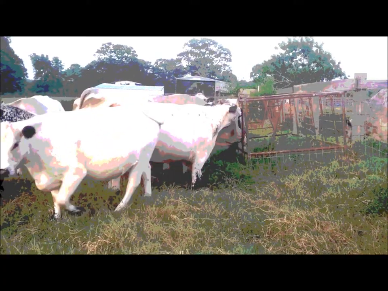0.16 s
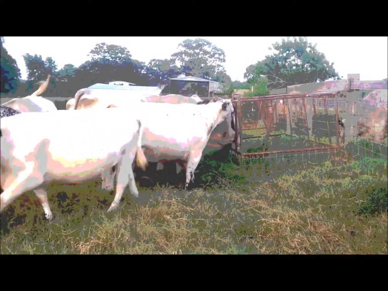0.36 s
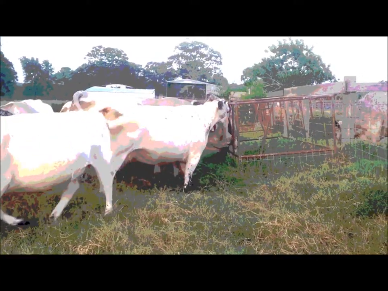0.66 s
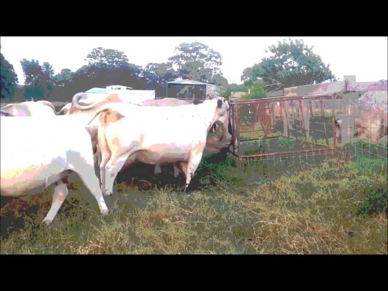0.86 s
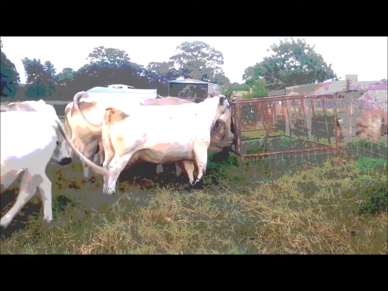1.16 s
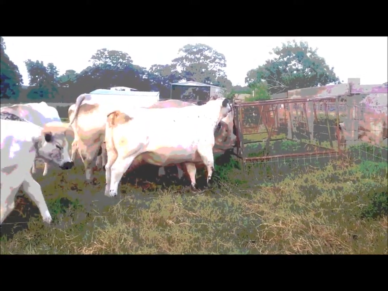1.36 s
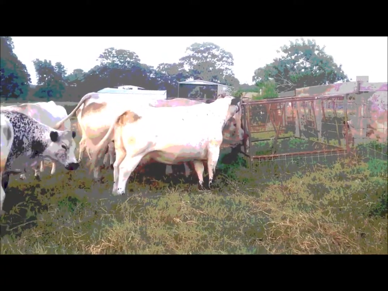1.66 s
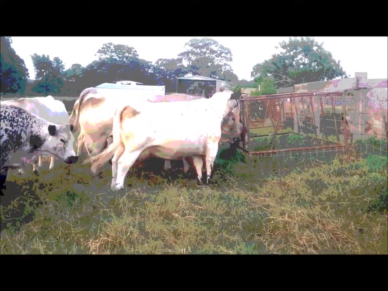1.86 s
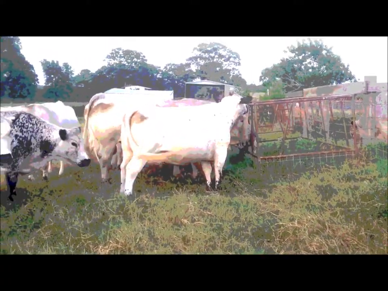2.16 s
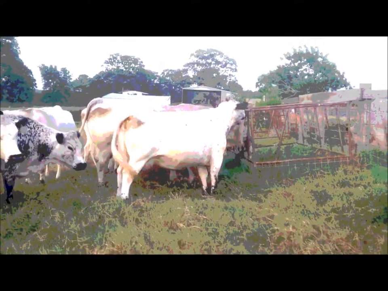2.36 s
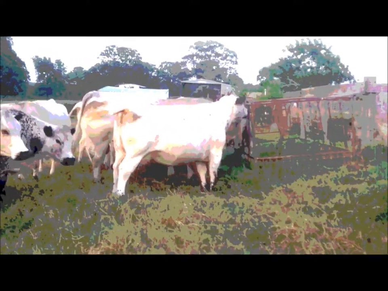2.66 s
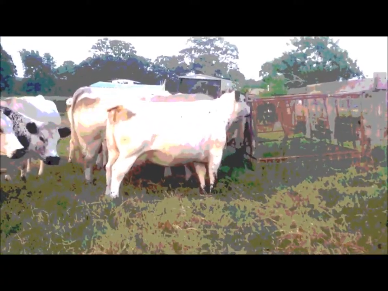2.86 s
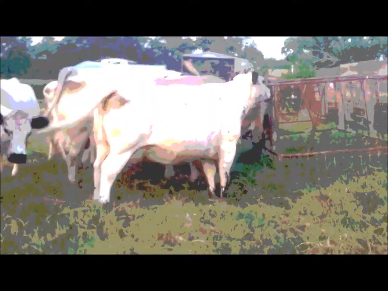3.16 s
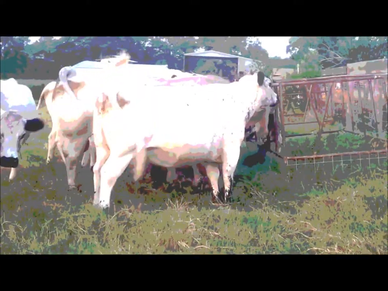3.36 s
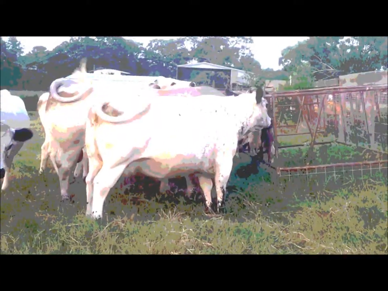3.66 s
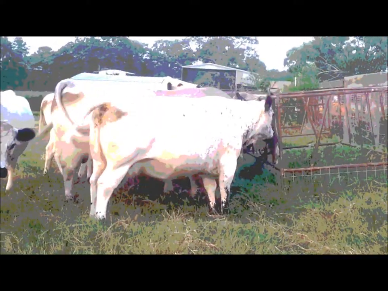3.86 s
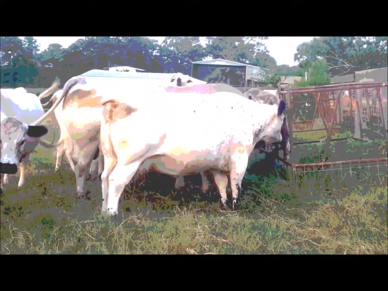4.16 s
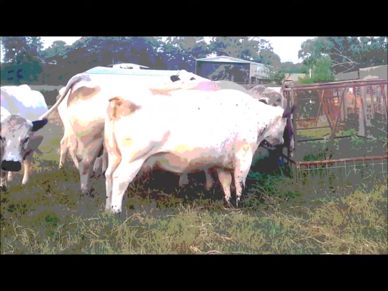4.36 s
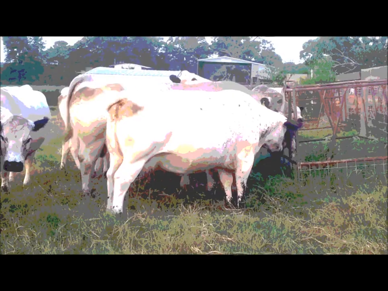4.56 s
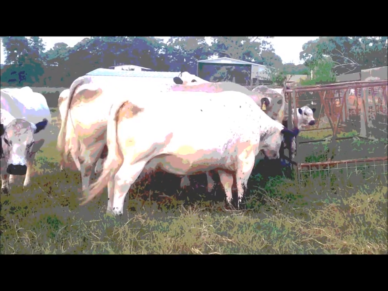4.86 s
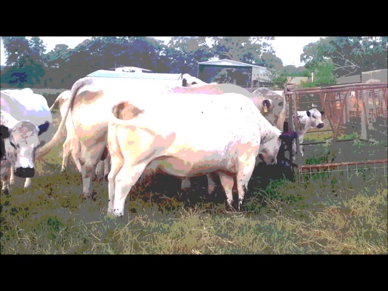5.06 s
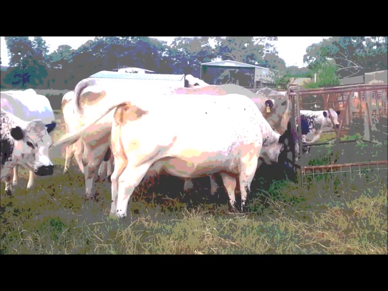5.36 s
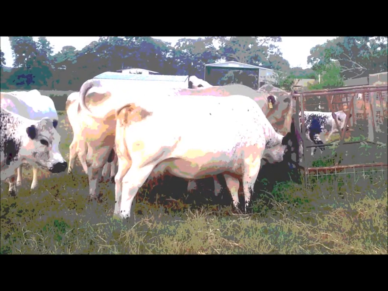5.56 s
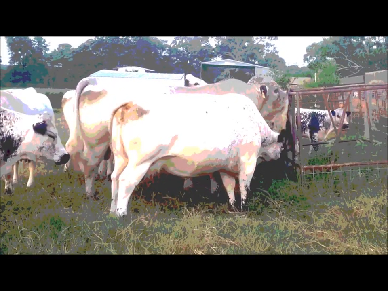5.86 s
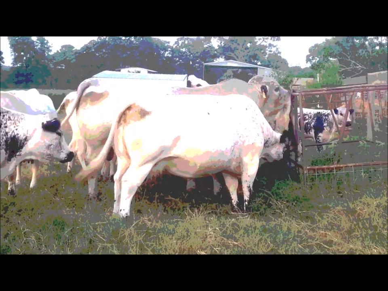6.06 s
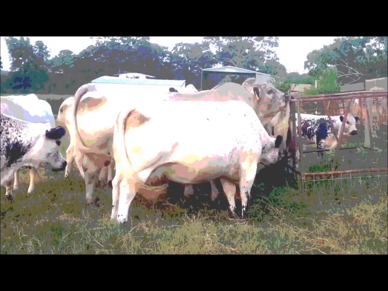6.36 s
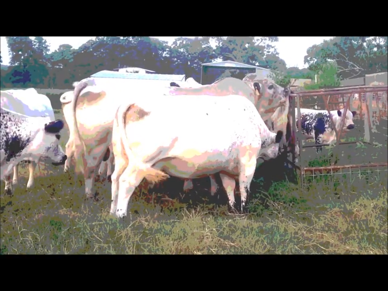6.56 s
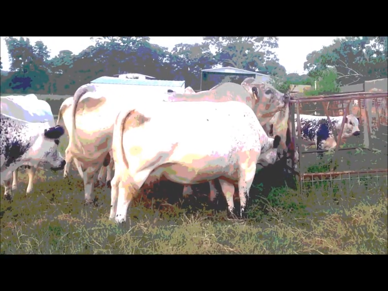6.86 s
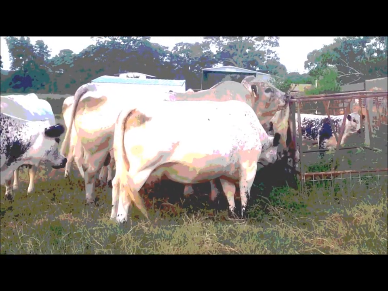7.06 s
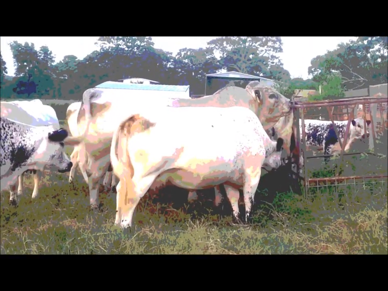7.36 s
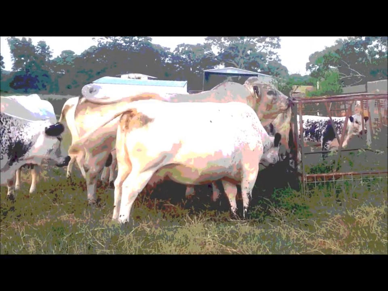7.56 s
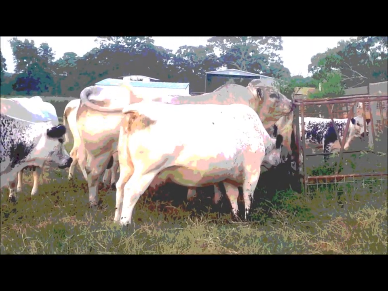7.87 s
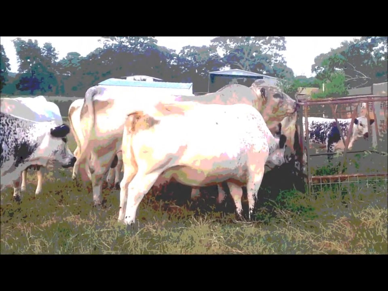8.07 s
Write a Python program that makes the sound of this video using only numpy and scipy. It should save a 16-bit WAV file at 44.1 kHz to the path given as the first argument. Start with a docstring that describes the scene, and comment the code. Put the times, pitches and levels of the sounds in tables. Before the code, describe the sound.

A nearby cow hums a long low closed-mouth moo, then two others bawl over each other, followed by a growl, snorts and hoof thuds.

```python
"""A near cow hums a long closed-mouth moo and grunts, as cattle crowd at a gate in a summer paddock.
Two others bawl open-mouthed over each other and one growls: vocal-fold harmonics pass through throat resonances.
Snorts are fluttering turbulence, whistles are narrow-band resonances, and hooves thud as damped pushes on turf.
The gate clicks in decaying modes, shaped noise makes rustling grass and a light breeze,
and two bush crickets buzz high as frequency-swept tones."""
import sys
import numpy as np
from scipy import signal
from scipy.fft import rfft, irfft, next_fast_len
from scipy.io import wavfile
from scipy.ndimage import uniform_filter1d, map_coordinates

SR = 44100
rng = np.random.default_rng(int(sys.argv[2]) if len(sys.argv) > 2 else 0)


def persist_wave(psi):
    """Save psi, clipped to +-1, as 16-bit WAV."""
    counts = np.round(np.clip(psi, -1, 1) * 32767).astype(np.int16)
    wavfile.write(sys.argv[1], SR, np.atleast_2d(counts).T)


N = 362047
T = np.arange(N) / SR

# low-frequency noise spectrum of breeze and hoof scuffs: f/Hz, relative level/dB
RUMBLE = [(20, -28), (40, -2), (58, 1.5), (90, 1.5), (150, -9), (250, -20), (500, -47.5)]


def undb(db):
    """Amplitude ratio: 20 dB are a factor of ten."""
    return 10 ** (np.asarray(db) / 20)


def unit(x):
    """Normalisation by effective value: scale to rms 1."""
    return x / np.sqrt(np.mean(x ** 2) + 1e-20)


def curves(table, t):
    """Linear interpolation: the columns of a table at times t."""
    s, *columns = np.transpose(table)
    return [np.interp(t, s, c) for c in columns]


def response(shape, hz):
    """Transfer function: the gain of a (f/Hz, level/dB) shape, interpolated over log frequency."""
    f, db = np.transpose(shape)
    return undb(np.interp(np.log(hz + 1), np.log(f), db))


def colour(x, shape):
    """Spectral filtering: weight each frequency by a shape that falls away beyond its ends; rms 1."""
    size = next_fast_len(len(x))
    hz = np.arange(size // 2 + 1) * SR / size + 0.00092  # the offset avoids division by zero
    top = 1 / (1 + (hz / shape[-1][0]) ** 12)
    bottom = 1 / (1 + (.5 * shape[0][0] / hz) ** 4)
    spectrum = rfft(x, size) * response(shape, hz) * top * bottom
    return unit(irfft(spectrum, size)[:len(x)])


def walk(t, rate):
    """Band-limited chance: a smooth curve through `rate` random values a second, spread about 1."""
    steps = (t - t[0]) * rate
    grid = np.arange(0, steps[-1] + 1, 1 / 10)
    values = rng.standard_normal(int(steps[-1]) + 2)
    smooth = map_coordinates(values, [grid], order=2, mode="nearest")
    return np.interp(steps, grid, smooth)


def span(start, end):
    """Uniform sampling: the sample times from start to end."""
    return np.arange(int(start * SR), int(end * SR)) / SR


def swell(t, edge, release=None):
    """Sine-squared envelope: opens over `edge` seconds, closes over `release` (the same unless given)."""
    opening = np.minimum((t - t[0]) / edge, (t[-1] - t) / (release or edge))
    return np.sin(np.pi / 2 * np.clip(opening, 0, 1)) ** 2


def add(out, t, x):
    """Superposition: mix x into out at its own times."""
    index = int(round(t[0] * SR)) + np.arange(len(x))
    inside = (index >= 0) & (index < N)
    out[index[inside]] += x[inside]


def yard(x, t60_s=0.3, wet_db=-17):
    """Diffuse reverberation: sheds and trees return faint scattered echoes that decay exponentially."""
    t = span(0, .6)
    tail = rng.standard_normal(len(t)) * np.exp(-np.log(1000) * t / t60_s) * (t > .012)
    tail = colour(tail, [(150, -5.0), (500, -12), (2000, -8.5), (7000, -5.5)]) / np.sqrt(len(t))
    return x + undb(wet_db) * signal.fftconvolve(x, tail)[:N]


def countryside():
    """Broadband ambience: distant sound is noise weighted towards the bass, with a drifting level."""
    # spectrum of the far countryside: f/Hz, relative level/dB
    far_shape = [(24, -24), (40, -10), (81, 2.5), (252, -11), (448, -12.5), (668, -10.5), (974, -11.5),
                 (2160, -25.5), (3760, -26.5), (6410, -31), (8000, -33.5), (10400, -66.5), (17600, -120)]
    return colour(rng.standard_normal(N), far_shape) * undb(-58.5 + 2.3 * walk(T, 6))


def breeze():
    """Wind noise: turbulence at the microphone gives a gusting low-frequency rumble."""
    # gusts of the breeze: t/s, level/dB
    gusts = [(0, -55), (.6, -62), (2.1, -62), (2.55, -56.5), (2.8, -50.5), (3.2, -58), (3.8, -56.5),
             (4.1, -55), (5.2, -55), (5.4, -43.5), (5.55, -60.5), (6.3, -64), (7.5, -54.5), (8.2, -69)]
    [wind_db] = curves(gusts, T)
    return colour(rng.standard_normal(N), RUMBLE) * undb(wind_db + 2.0 * walk(T, 13))


def grass():
    """Incoherent summation: crackling of dry blades and swishes add as powers, shaping impulsive noise."""
    # legs and tails swishing through dry grass: middle t/s, length/s, level/dB
    swishes = [(0.02, 0.17, -57), (0.634, 0.34, -58.5), (1.1, 0.16, -56), (1.65, 0.69, -62),
               (2.128, 0.32, -61), (2.724, 0.6, -62.5), (3.313, 0.26, -56), (4.017, 0.38, -57),
               (4.849, 0.19, -58.5), (5.39, 0.37, -56), (6.398, 0.31, -58.5), (6.87, 0.31, -60),
               (7.412, 0.44, -59), (7.815, 0.11, -57), (8.175, 0.12, -58)]
    # spectrum of dry blades: f/Hz, relative level/dB
    rustle = [(1500, -6.5), (2500, -1), (3700, 3.5), (5000, -5), (6500, -7.5), (9000, 2.5), (11500, 1.5),
              (13500, -4.5), (16000, -4.5)]
    # the rustle between swishes dies down as the herd settles
    grass_db, fade_db_per_s = -61, 0.5
    drift_db = .8 * walk(T, 5)
    power = undb(grass_db - fade_db_per_s * T + drift_db) ** 2
    for middle, length, db in swishes:
        t = span(middle - length / 2, middle + length / 2)
        add(power, t, undb(db) ** 2 * swell(t, length / 2))
    # exponential chance in decibels makes a few samples stand out as crackles
    crackle_db = np.minimum(2.4 * rng.exponential(size=N), 19)
    blades = rng.standard_normal(N) * undb(crackle_db)
    flicker_db = 1.2 * walk(T, 35)
    return colour(blades, rustle) * np.sqrt(power) * undb(flicker_db)


def cricket(stroke_hz, base_hz, arch_hz, scatter_hz):
    """Stridulation: each wing stroke speeds up and slows down, so the tooth rate draws an arch."""
    stroke = np.cumsum(stroke_hz * (1 + 0.0091 * walk(T, 20))) / SR % 1
    arch = np.sin(np.pi * np.minimum(stroke / 0.74, 1))  # silent for the rest of the stroke
    hz = base_hz + arch_hz * arch + scatter_hz * walk(T, 1500)
    tone = np.sqrt(abs(arch)) * np.sin(2 * np.pi * np.cumsum(hz) / SR)
    return unit(tone) * undb(1.1 * walk(T, 30))


def crickets():
    """Two independent stridulators: a near one sings in bouts; a farther, lower one never stops."""
    # near cricket's bouts of song: start t/s, end t/s, level/dB
    bouts = [(-.1, 6.3, -63), (6.44, 6.85, -65.5)]
    gate = np.zeros(N)
    for start, end, db in bouts:
        t = span(start, end)
        add(gate, t, undb(db) * swell(t, 0.03))
    near = gate * cricket(stroke_hz=67.7, base_hz=9123, arch_hz=890, scatter_hz=89.7)
    return near + undb(-68) * cricket(stroke_hz=70, base_hz=8750, arch_hz=400, scatter_hz=220)


def clicks(crack=0.47, crack_s=0.0012):
    """Impact excitation: a short noisy crack with a ring of exponentially damped modes."""
    # gate latch and dry stalks: t/s, peak level/dB
    strikes = [(2.088, -41.5), (2.345, -45), (2.351, -29.5), (2.356, -35), (7.621, -48), (7.68, -45.5)]
    # modes of the ring: f/Hz, relative level/dB, t60/s
    modes = [(2330, -1, 0.026), (2850, 3, 0.01), (3750, 8, 0.0074), (5300, 4, 0.0068), (5940, -5, 0.02),
             (6620, 3, 0.0088)]
    out, t = np.zeros(N), span(0, .05)
    for start, db in strikes:
        ring = 0
        for hz, mode_db, t60 in modes:
            mode = np.sin(2 * np.pi * (hz * t + rng.random()))
            ring = ring + undb(mode_db) * mode * np.exp(-np.log(1000) * t / t60)
        click = ring + crack * rng.standard_normal(len(t)) * np.exp(-t / crack_s)
        add(out, t + start, click / abs(click).max() * undb(db))
    return out


def hooves(decay_s=0.018, push_s=0.0036, scuff=0.65, gain_db=-3):
    """Heavily damped oscillation: each hoof gives the turf a soft push that soon dies out."""
    # heavy hoof falls: t/s, level/dB before gain_db, f/Hz
    falls = [(2.779, -40, 104), (3.071, -42, 142), (3.56, -37, 188), (4.06, -43, 90), (4.274, -42, 82),
             (4.739, -40, 57), (5.07, -44, 72.7), (5.379, -48, 75.4), (5.709, -38, 174), (5.988, -44, 120),
             (6.359, -43, 149), (6.537, -45, 184), (7.107, -45, 105), (7.349, -34, 63), (7.494, -39.5, 56),
             (7.542, -36, 73.6), (7.713, -36.5, 89), (7.756, -36, 62.6)]
    out, t = np.zeros(N), span(0, 0.12)
    for start, db, hz in falls:
        thud = np.sin(2 * np.pi * hz * t) + scuff * colour(rng.standard_normal(len(t)), RUMBLE)
        shape = (1 - np.exp(-t / push_s)) * np.exp(-t / decay_s)
        add(out, t + start, -thud * shape / shape.max() * undb(db + gain_db))
    return out


def snorts(attack_share=0.34, release_share=0.41):
    """Modulated turbulence: air blasts flapping nostrils; wet snorts burst open, dry hissing ones swell."""
    # blasts: t/s, length/s, flutter level/dB, hiss level/dB relative to the flutter
    blasts = [(1.799, 0.048, -50.5, -12), (2.476, 0.043, -52.5, -7), (2.734, .1, -48.5, -14),
              (3.02, 0.12, -45.5, -12), (4.064, 0.06, -52.5, -7), (4.575, 0.087, -56, -7),
              (4.784, 0.1, -44, -8.5), (4.999, .13, -43.5, -8), (5.254, .26, -44, -9.5),
              (5.628, 0.036, -45.5, -16.5), (5.657, 0.12, -50.5, -17), (5.901, 0.049, -46.5, -16),
              (6.327, 0.072, -51.5, -4.5), (6.53, .1, -56.5, 1.5), (6.737, 0.084, -56, -3),
              (7.093, 0.073, -54, -4), (7.305, .08, -51.5, -5.5), (7.518, 0.073, -54, -5.5),
              (7.928, .1, -53, -4), (8.153, 0.13, -54, -0.5)]
    # nostril flutter shaped by the long nasal passages: f/Hz before the flare, relative level/dB
    flutter_shape = [(110, 1.5), (180, 4.5), (300, -21), (560, -12), (680, 2), (780, -1), (890, -19.5),
                     (980, -5), (1280, -19.5), (1520, -14), (2000, -14), (3000, -47)]
    # hiss from the same passages: f/Hz before the flare, relative level/dB
    hiss_shape = [(900, 3.5), (1400, -2.5), (1770, 2.5), (1980, -30), (2230, 12.5), (2450, 3), (2760, 7),
                  (3080, 1.5), (3250, 6.5), (3500, 3.5), (3750, 1.5), (4000, 2.5), (4600, -3.5),
                  (7000, -21)]
    out = np.zeros(N)
    for start, length, db, hiss_db in blasts:
        t = span(start, start + length)
        flap = undb(2.8 * walk(t, 220))
        # the nostrils flare differently each time, which shifts their resonances but not the levels
        flare = np.array([1 + .045 * rng.standard_normal(), 1])
        flutter = colour(rng.standard_normal(len(t)) * flap, flare * flutter_shape)
        hiss = colour(rng.standard_normal(len(t)) * flap, flare * hiss_shape)
        dryness = np.clip((hiss_db + 16) / 8, .12, 1)
        envelope = swell(t, length * attack_share * dryness, release_share * length)
        add(out, t, (flutter + undb(hiss_db) * hiss) * undb(db) * envelope)
    return out


def whistles():
    """Narrow-band noise: air in a narrow passage rings one gliding resonance, half tone and half hiss."""
    # wheezes in nose and throat: t/s, length/s, first f/Hz, last f/Hz, random changes/Hz, level/dB
    wheezes = [(-.04, 0.157, 1520, 1464, 75.6, -58.5), (.08, .5, 1780, 1850, 270, -64.5),
               (.72, 0.14, 1200, 1250, 70, -65.5), (0.92, 0.23, 1620, 1600, 130, -69),
               (.85, 1, 2520, 2950, 350, -66.5), (2.826, .2, 3240, 3100, 241, -60)]
    out = np.zeros(N)
    for start, length, first_hz, last_hz, change_hz, db in wheezes:
        t = span(start, start + length)
        angle = 2 * np.pi * np.cumsum(np.linspace(first_hz, last_hz, len(t))) / SR
        ring = walk(t, change_hz) * np.sin(angle) + walk(t, change_hz) * np.cos(angle)
        add(out, t, unit(ring) * undb(db) * swell(t, 0.14 * length))
    return out


def folds(t, hz, jitter):
    """Quasi-periodic oscillation: phase of the vocal folds in cycles, with random frequency jitter."""
    return np.cumsum(hz * (1 + jitter * walk(t, 90))) / SR


def voiced(phase, hz, throat, split_hz, spread, waver_db):
    """Source-filter theory: fold harmonics through the throat, split into (chest part, mouth part)."""
    t = np.arange(len(hz)) / SR
    slow_t, slow_hz = t[::32], hz[::32]  # gains change slowly, so a coarse time grid serves
    chest, mouth = 0, 0
    for k in range(1, int(throat[-1][0] / np.mean(hz)) + 1):
        low = 1 / (1 + (k * slow_hz / split_hz) ** 8)
        # the soft tongue and palate quiver, so each upper harmonic wavers by itself
        waver = undb(waver_db * (1 - low) * walk(slow_t, 45.1))
        gain = response(throat, k * slow_hz) * waver
        # the throat delays each harmonic differently, which spreads the pulse
        wave = np.cos(2 * np.pi * k * phase + spread * rng.standard_normal())
        chest = chest + wave * np.interp(t, slow_t, gain * low)
        mouth = mouth + wave * np.interp(t, slow_t, gain * (1 - low))
    return chest, mouth


def puffs(phase, throat, open_share):
    """Pulsed turbulence: airflow noise bursts once a fold cycle and decays within it."""
    return colour(rng.standard_normal(len(phase)) * np.exp(-(phase % 1) / open_share), throat)


def open_moo(t, hz, chest_db, mouth_db, hoarse, throat, jitter, waver_db, air_db, spread, shimmer=0.089):
    """Open-tract resonance: chest tone plus bright mouth; hoarseness shakes the folds and leaks air."""
    out = np.zeros(N)
    phase = folds(t, hz, jitter * hoarse)
    chest, mouth = voiced(phase, hz, throat, split_hz=470, spread=spread, waver_db=waver_db)
    air = hoarse * undb(air_db) * puffs(phase, throat, open_share=1.0)
    mouth = unit(mouth) * (1 + shimmer * walk(t, 118.7)) + air
    call = unit(chest) * undb(chest_db) + mouth * undb(mouth_db)
    add(out, t, call * swell(t, 0.02))
    return out


def growl():
    """Low-rate pulsation: slow, crisp fold pulses grow brighter over a steady chest tone."""
    # throat response: f/Hz, relative level/dB
    throat = [(65, -1), (140, -5.5), (210, -5.5), (300, -15), (500, -46), (800, -9), (1200, -30),
              (1900, -26), (2230, -3.5), (2500, -31), (2760, -1.5), (2950, -21), (3230, -7.5), (3700, -31)]
    start_hz, sag_hz_per_s = 71.5, 3.7
    drop_hz, drop_s = 4.5, 0.0388  # the pitch falls away at the very end
    t = span(4.03, 5.11)
    age = t - t[0]
    hz = start_hz - sag_hz_per_s * age - drop_hz * np.exp((t - t[-1]) / drop_s)
    mouth_db = -64.5 + 7 * age
    return open_moo(t, hz, -53.5, mouth_db, 0.13, throat, jitter=.016, waver_db=1.5, air_db=2, spread=.25)


def bawl(table, throat, chest_db, boom_db, chest_attack_s, chest_release_s, hoarse, end_hoarse, air_db,
         waver_db, closing_s):
    """Resonant coupling: the chest tone builds, then booms near resonance; the end is hoarse and dull."""
    # the chest booms whenever the second harmonic glides through the throat's lowest resonance
    boom_hz, boom_width_hz = 368, 59
    t = span(table[0][0], table[-1][0])
    hz, db = curves(table, t)
    boom = 1 / (1 + (2 * (2 * hz - boom_hz) / boom_width_hz) ** 2)
    build_db = 20 * np.log10(swell(t, chest_attack_s, chest_release_s) + 1e-6)
    # the voice turns hoarse as its breath runs out
    breathless = np.exp(-((t - t[-1]) / .17) ** 2)
    hoarseness = hoarse + (end_hoarse - hoarse) * breathless
    call = open_moo(t, hz, db + chest_db + boom_db * boom + build_db, db, hoarseness, throat,
                    jitter=0.0181, waver_db=waver_db, air_db=air_db, spread=1.12)
    # the closing mouth muffles the call
    muffled = signal.sosfiltfilt(signal.butter(2, 1900, fs=SR, output="sos"), call)
    closing = np.clip(1 + (T - t[-1]) / closing_s, 0, 1)
    return call + closing * (muffled - call)


def first_bawl():
    """Formant filtering: an arched call whose chest tone enters fast and booms strongly."""
    # arch of the call: t/s, f/Hz, level/dB
    arch = [(2.55, 138.7, -60), (2.66, 150.9, -53), (2.75, 164.4, -49), (2.87, 190.2, -49),
            (3.0, 203.3, -43.5), (3.12, 207.1, -41.5), (3.23, 191.5, -40.5), (3.32, 150.8, -55),
            (3.36, 134, -70)]
    # throat response: f/Hz, relative level/dB
    throat = [(150, -26), (300, 13.5), (410, 2), (480, -22), (740, -6.5), (830, 2.5), (910, 3), (1020, -9),
              (1200, -3.5), (1400, 4.5), (1620, -5), (1900, 3), (2250, -8.5), (2500, -18), (2900, -8.5),
              (3200, -19), (3500, -15.5), (5200, -34.5)]
    return bawl(arch, throat, chest_db=-5.5, boom_db=18.5, chest_attack_s=0.037, chest_release_s=0.27,
                hoarse=0.1, end_hoarse=0.24, air_db=8, waver_db=2.5, closing_s=0.097)


def second_bawl():
    """Formant filtering: a higher arched call whose chest tone builds slowly and whose end is very hoarse."""
    # arch of the call: t/s, f/Hz, level/dB
    arch = [(3.1, 176.8, -55), (3.18, 194, -49.5), (3.3, 214.7, -41.5), (3.42, 229, -41.5),
            (3.56, 236.8, -42.5), (3.76, 232.4, -44), (3.87, 205, -46), (4.0, 157.9, -51),
            (4.08, 137.3, -62.5)]
    # throat response: f/Hz, relative level/dB
    throat = [(150, -4), (195, -13.5), (230, -4), (370, -2), (470, -18.5), (700, -7), (940, -2),
              (1250, 4.5), (1420, -4.5), (1660, 1), (2150, -12.5), (2400, -13), (2650, -5.5), (2850, -12.5),
              (3250, -13.5), (3550, -19.5), (5500, -45)]
    return bawl(arch, throat, chest_db=-4.5, boom_db=4.5, chest_attack_s=0.28, chest_release_s=0.026,
                hoarse=.11, end_hoarse=.85, air_db=3, waver_db=2.05, closing_s=0.35)


def closed_moo(t, hz, rough, upper_db, rasp_db, fundamental_db):
    """Closed-tract resonance: lips shut, the head rings near the second harmonic; air rasps in the nose."""
    # response of head and nose to the folds: f/Hz, relative level/dB
    nose = [(50, -35), (95, -22.5), (125, -10.5), (180, 1.5), (232, -3.5), (280, -27), (375, -34),
            (465, -30), (515, -31.5), (560, -48), (900, -60.5), (1230, -54), (1500, -74)]
    # spectrum of the rasping air: f/Hz, relative level/dB
    rasp_shape = [(400, -7.5), (700, -18), (790, 3), (880, -25), (1070, -10.5), (1160, 7), (1260, -22),
                  (1420, -9.5), (1800, -16.5), (2150, -35), (2700, -11.5), (3400, -16.5), (4000, -17.5),
                  (5000, -25)]
    phase = folds(t, hz, jitter=0.0033 + 0.049 * rough)
    low, upper = voiced(phase, hz, nose, split_hz=430, spread=0.86, waver_db=2)
    fundamental = signal.sosfiltfilt(signal.butter(4, 135, fs=SR, output="sos"), low)
    tone = low + (undb(fundamental_db) - 1) * fundamental + undb(upper_db) * upper
    # hold the local rms near 1 whatever the harmonic balance
    tone = tone / np.sqrt(uniform_filter1d(tone ** 2, size=1400) + 1e-9)
    tremble = 1 + rough * (1.17 * walk(t, 55) + 0.34 * walk(t, 220))
    rasp = puffs(phase, rasp_shape, open_share=0.45) * undb(1.7 * walk(t, 45) + rasp_db)
    # a strained, rough voice rasps most
    return tone * tremble + rasp * np.clip(0.51 + 3 * rough, 0, 1)


def near_cow():
    """Phonation under changing strain: one long hum that turns strained halfway, and three grunts."""
    # closed-mouth moo: t/s, f/Hz, level/dB
    moo = [(0.025, 102.5, -43), (0.15, 122, -37.5), (0.215, 131, -42), (0.265, 101, -34),
           (0.305, 95, -24.8), (0.42, 91.3, -25), (0.62, 93.6, -23), (0.97, 93.7, -24.3), (1.12, 99.3, -32),
           (1.72, 98.3, -29.3), (1.79, 91, -24.7), (1.84, 84, -50)]
    # grunts: t/s, length/s, first f/Hz, last f/Hz, level/dB,
    # then gains before levelling: upper harmonics/dB, fundamental/dB
    short_grunts = [(2.31, 0.22, 89.3, 79.4, -34, 14.5, 12), (3.773, 0.11, 114.8, 117, -33, 8.5, -10),
                    (4.004, 0.098, 112.2, 95.4, -39, 17, 9)]
    out, t = np.zeros(N), span(moo[0][0], moo[-1][0])
    hz, db = curves(moo, t)
    # the hum starts gruff, settles and dulls as the lips close, then turns strained and raspy
    age = t - t[0]
    strain = np.clip((t - 1.02) / 0.069, 0, 1)
    rough = .03 + 0.19 * np.exp(-age / 0.15) + 0.15 * strain
    # subtracting db keeps the rasp independent of the hum's level
    hum = closed_moo(t, hz, rough, upper_db=11 - 19.5 * age, rasp_db=-62.5 + 6 * strain - db,
                     fundamental_db=5.5 * strain)
    add(out, t, hum * undb(db) * swell(t, 0.0079))
    for start, length, first_hz, last_hz, db, upper_db, fundamental_db in short_grunts:
        t = span(start, start + length)
        hz = np.linspace(first_hz, last_hz, len(t))
        grunt = closed_moo(t, hz, rough=0.21, upper_db=upper_db, rasp_db=-24.5, fundamental_db=fundamental_db)
        add(out, t, grunt * undb(db) * swell(t, 0.43 * length))
    return out


def scene():
    """Linear superposition: the paddock, the gate and the herd, with more echo on the bawls."""
    paddock = breeze() + grass() + countryside()
    bawls = yard(first_bawl() + second_bawl(), wet_db=-12)
    others = yard(near_cow() + whistles() + growl() + snorts() + clicks(), wet_db=-20.0)
    return (bawls + others + hooves() + crickets() + paddock)[None]


def record(dry):
    """Band limitation: a small microphone loses the deepest bass; the recorder cuts the top."""
    thin = signal.sosfilt(signal.butter(3, 40, "high", fs=SR, output="sos"), dry)
    return signal.sosfilt(signal.ellip(10, .2, 70, 15750, fs=SR, output="sos"), thin)


dry = scene()
out = record(dry)
persist_wave(out)
```